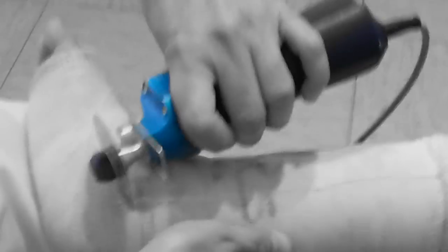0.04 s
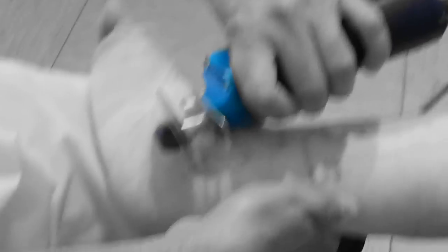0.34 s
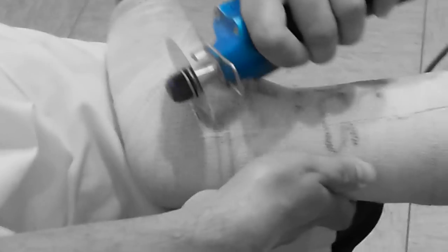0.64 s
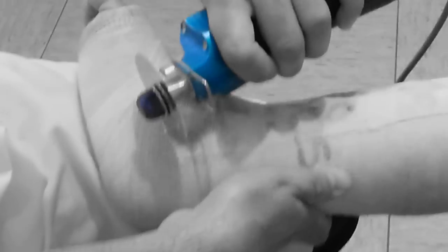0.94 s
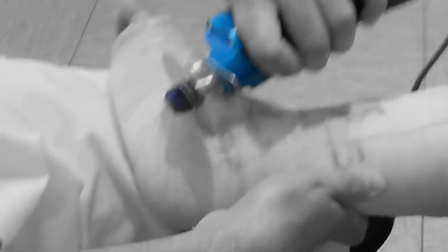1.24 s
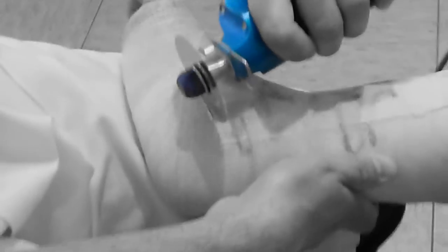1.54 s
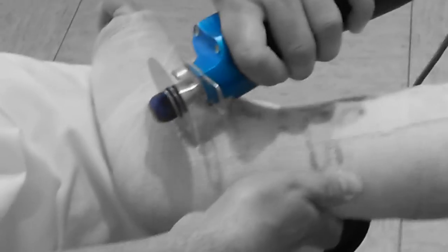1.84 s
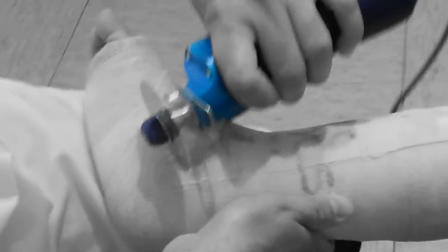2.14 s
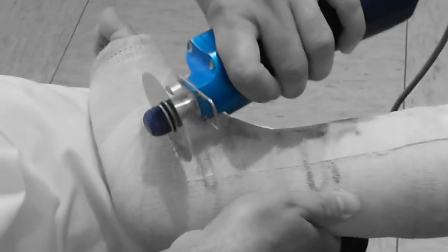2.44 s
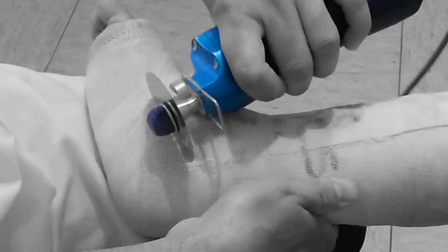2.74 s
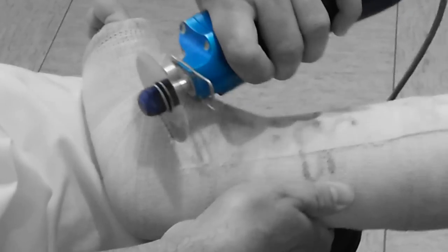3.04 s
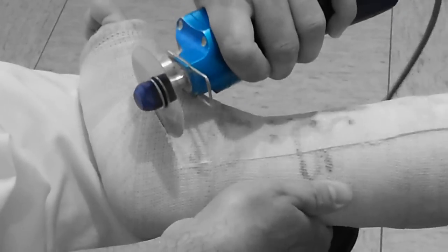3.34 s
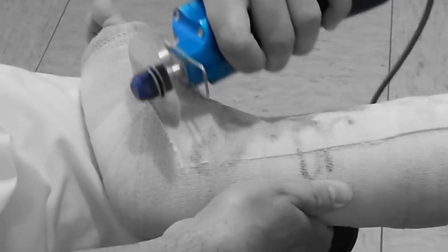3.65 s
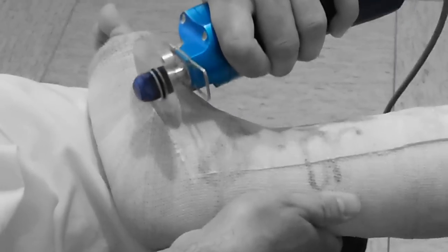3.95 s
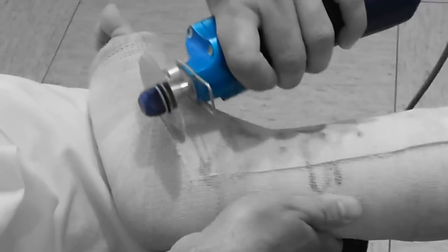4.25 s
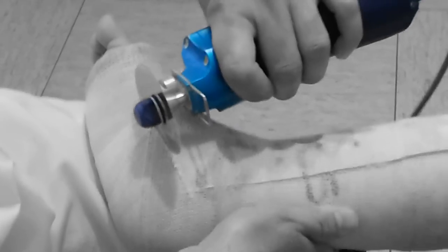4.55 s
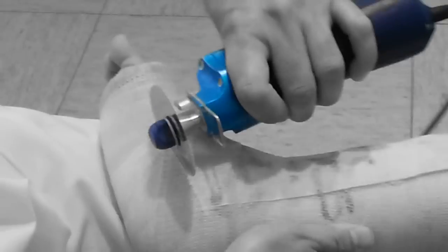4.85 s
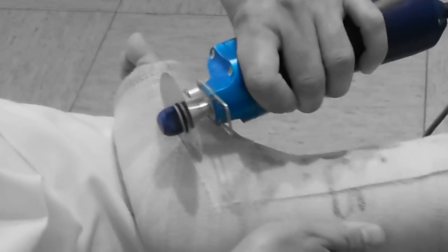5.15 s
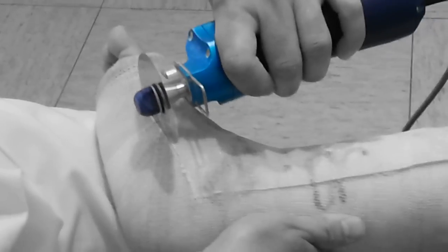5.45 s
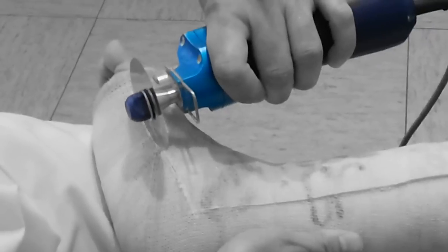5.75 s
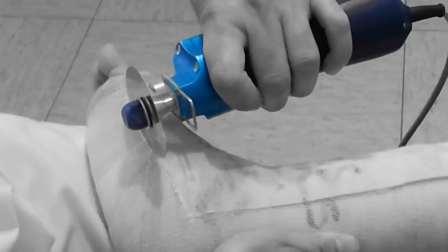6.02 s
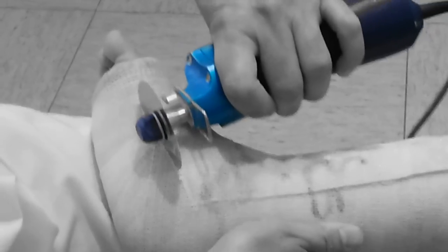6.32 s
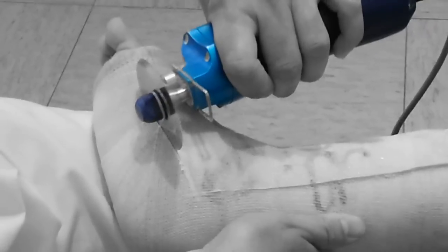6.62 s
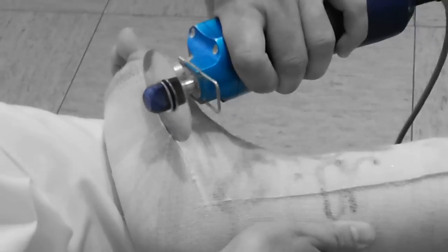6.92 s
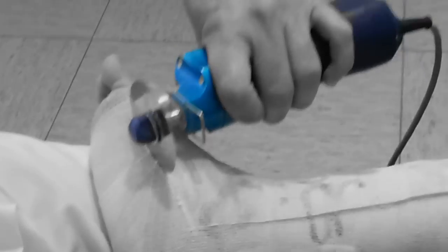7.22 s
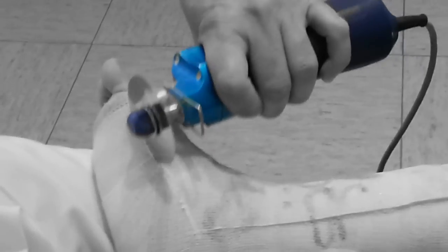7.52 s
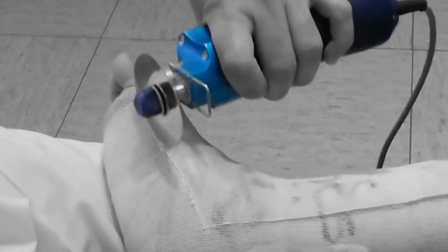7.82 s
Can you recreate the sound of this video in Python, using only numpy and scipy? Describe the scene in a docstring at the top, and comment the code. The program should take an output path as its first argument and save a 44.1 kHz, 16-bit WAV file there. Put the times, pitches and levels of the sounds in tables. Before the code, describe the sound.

Close to a stereo microphone in a small room, an oscillating saw buzzes through a plaster cast from start to finish. A bright ringing whine mixes with a gritty, hissing rasp and tiny snapping chips, above a lower motor hum and a faint rush. The pitch dips a little as the blade is pressed in. Thin squeals come and go, and short scraping crunches break in, with the cutting turning rougher near the end.

```python
"""The whine and rasp of an oscillating saw in a plaster cast, close to a camera's stereo mic in a small room.
Each swing knocks the hollow cast, which rings near 1.7 kHz; the teeth rasp through the plaster,
grinding grit and snapping off chips, and the pinched blade squeals. Underneath lies a steady rush,
and the motor hums at the stroke rate, sagging as the blade is pressed in.
Now and then the teeth catch with a short crunch."""
import sys
import numpy as np
from scipy import signal
from scipy.fft import rfft, irfft
from scipy.io import wavfile
from scipy.ndimage import uniform_filter1d, minimum_filter1d, map_coordinates

SR = 44100
rng = np.random.default_rng(int(sys.argv[2]) if len(sys.argv) > 2 else 0)


def output_pcm(signal):
    """Save a mono or channel-first signal as 16-bit PCM at the path in sys.argv[1].

    Samples are clipped to [-1, 1] before scaling.
    """
    pcm = np.clip(np.atleast_2d(signal).T, -1, 1) * 32767
    wavfile.write(sys.argv[1], SR, np.round(pcm).astype(np.int16))


N = 347508
TIME, BINS = np.arange(N) / SR, np.fft.rfftfreq(N, 1 / SR)
ORDERS, SHELL_ORDERS = np.arange(1, 73), np.arange(7, 12)  # multiples of the stroke rate

# the motor sags as the blade is pressed in and recovers as it is eased: time_s, stroke_hz
MOTOR_SPEED = [(0.0, 187), (0.2, 183.8), (0.64, 183), (0.92, 188.6), (1.1, 184.9), (2.18, 185.4),
               (2.42, 180.4), (2.56, 183.7), (2.76, 177.4), (2.9, 182.2), (3.18, 185), (3.56, 183.4),
               (3.66, 186.9), (3.96, 184.1), (4.08, 188.4), (4.26, 184.6), (4.48, 187), (4.62, 185.3),
               (5.32, 184.8), (5.48, 187.5), (5.68, 187), (6.04, 189.7), (6.34, 182.8), (6.66, 186.6),
               (6.86, 184.2), (7.18, 189.8), (7.36, 185.6), (7.87, 192.8)]
# how the blade sits in the slot: time_s, roughness (0-1)
BLADE_SEAT = [(0, 0.27), (.22, 0.12), (.62, 0.14), (.75, 0.32), (.95, 0.15), (1.85, 0.28), (2.02, 0.33),
              (2.2, 0.17), (2.85, 0.14), (3.45, 0.2), (3.62, 0.26), (3.8, 0.18), (4.9, 0.2), (5.6, 0.12),
              (5.87, 0.17), (6.2, 0.02), (6.33, 0.35), (6.45, 0.2), (7.1, 0.26), (7.45, 0.23), (7.66, 0.6),
              (7.88, 0.31)]
# three close modes of the hollow cast trade strength as the blade moves: time_s, low_db, mid_db, top_db
CAST_MODES = [(0, -36, -29, -19.5), (.24, -21.5, -20.5, -25.5), (.36, -23.5, -21.5, -30),
              (.55, -23, -19, -21.5), (.8, -30, -26, -19), (1.0, -47, -17.5, -17.5),
              (1.15, -35, -34, -17.5), (1.5, -26.5, -38, -16), (1.85, -26, -21, -17.5),
              (2.05, -51, -20.5, -26), (2.2, -70, -24, -17.5), (2.6, -50, -24.5, -19.5),
              (2.82, -54, -30, -20), (3.0, -43, -23, -29), (3.45, -43, -21, -30), (3.75, -20.5, -28, -19),
              (4.1, -35, -23, -21), (4.15, -24, -26, -16), (4.26, -22, -28, -23), (4.4, -30, -37, -20.5),
              (4.48, -25, -37, -19), (4.68, -28, -33, -21.5), (4.84, -28, -27, -22),
              (5.2, -28.5, -36, -24.5), (5.56, -27, -23, -22), (6.3, -31, -22, -30.5),
              (6.5, -31, -20, -27.5), (6.8, -29, -19.5, -29), (7.1, -38, -34, -24),
              (7.3, -25.5, -29, -17.5), (7.8, -27, -32, -56)]
# the blade slips off the shell for a moment: middle_s, half_length_s, ring_change_db, rasp_change_db
SKIPS = [(0.174, 0.042, -4.5, -2), (0.694, 0.057, -2, 1.5), (1.64, 0.045, -11, -2.5),
         (2.377, 0.069, -3, 0.5), (2.67, 0.033, -10, -1), (3.072, 0.013, -11, -4.5),
         (3.53, 0.028, -3, -1.5), (3.671, 0.016, -4, -5.5), (3.949, 0.036, -8, 1), (4.089, 0.023, -1.5, -1),
         (4.333, 0.027, -4, 0.5), (4.416, 0.028, -3.5, -3.5), (4.62, 0.034, -13, 1),
         (5.366, 0.019, -6, -1.5), (5.911, 0.13, -14, -0.5), (6.11, 0.022, 1, -2),
         (6.399, 0.0083, -4, -5.5), (6.679, 0.064, -8.5, 0.5), (6.94, 0.031, -30, -2.5),
         (7.163, 0.027, -23, -1.5), (7.515, 0.044, -14, -1.5), (7.613, 0.074, -18, -2)]
# colour of blade and plaster: frequency_hz, relative_db
BLADE_COLOUR = [(1290, 2), (2200, -3), (2390, -5.5), (2870, -2.5), (3170, -4.5), (3440, -2), (4390, -6.5),
                (4840, 0.5), (5410, 2.5), (6760, -7), (7900, -1.5), (9440, -11.5), (11000, -14.5),
                (11900, -24), (13000, -18)]
# the pinched blade sings in one of its modes: middle_s, length_s, pitch_hz, half_width_hz, strength_db
SQUEALS = [(0.35, 2.1, 7700, 260, 10.5), (0.11, 0.16, 3450, 263, 9.5), (0.476, 0.5, 2770, 80, 5.5),
           (0.56, 0.25, 3500, 260, 8), (0.943, 0.17, 3680, 150, 11), (1.105, 0.11, 5450, 330, 11),
           (1.366, 0.12, 5840, 150, 8), (1.342, 0.036, 3700, 400, -7), (1.51, 0.18, 3300, 130, 10),
           (1.496, 0.2, 5360, 260, 7), (1.75, 0.16, 5700, 150, 14), (1.91, 0.12, 3412, 170, 12),
           (2.387, 0.12, 3580, 260, 15.5), (2.7, 0.28, 3780, 258, 7), (2.4, 0.34, 5700, 170, 15),
           (2.87, 0.2, 5830, 170, 12), (2.94, 2.8, 10600, 259.7, 9), (3.348, 0.34, 3450, 200, -2),
           (3.7, 1.21, 5850, 263, 3), (4.696, 0.55, 3300, 110.2, 6), (5.0, 1.19, 5120, 90, 9),
           (5.16, 0.63, 4148, 110.1, 12), (5.6, 0.21, 3870, 110, 5), (5.931, 0.42, 3275, 170, 14.5),
           (5.93, 0.37, 4120, 110, 10), (5.9, 0.25, 5730, 550, 11), (6.65, 0.56, 3950, 240, 10),
           (7.1, 2.2, 7897, 259.8, 10.5)]
# colour of the grit, on top of the blade's: frequency_hz, relative_db
GRIT_COLOUR = [(2200, -17.5), (3500, -12), (5500, -9.5), (8000, -5.5), (10500, -4.5)]
# bite of the teeth, as rasp at 4.5-7 kHz and fizz above it: time_s, base_level_db, fizz_relative_db
TOOTH_BITE = [(0, -26, -1.5), (.1, -21, 0), (.6, -23.5, 2), (.95, -23, -3.5), (1.1, -22.5, -1),
              (3.3, -21.5, -1.5), (5.6, -22.5, -2.5), (5.92, -22, -2.5), (6.15, -23, -2), (6.7, -22, -0.1),
              (7.88, -22, -2.5)]
# motor and gear hum: order, base_level_db, db_per_hz_of_speed, waver_db
HUM_ORDERS = [(1, -43, -0.53, 1.2), (2, -38.5, 0.5, 2), (3, -37.5, 0, 0.7), (4, -40, 0, 2.5),
              (5, -40, 0, 2), (6, -37, -0.47, 0)]
# hum orders swell as the tool is moved and leaned on: time_s, second_db, third_db, fourth_db, fifth_db
HUM_SWELLS = [(0, 0, -5, -5, -5), (.2, -4, 0.5, 3.5, -9), (.68, -5, -4, -2, -9), (.86, -17, 4, -2, -1),
              (.96, -2.5, 0, -2.5, -4), (1.65, -7.5, 3.5, -4.5, -0.5), (2.1, -5, 2, -3, -1),
              (2.44, -5, -7, -7, -1), (2.65, 1, -3.5, -7, 1), (3.3, -4, 2, -9, 2), (3.52, -9, 4, -1, 8),
              (3.65, -3, 3.5, -4, 3), (3.95, -9, 2, -5, 6), (4.5, -8.5, 1.5, -4, -2),
              (5.3, -5, 5.5, -5, 1.5), (5.6, -6, -2, -20, -1), (5.92, 0.5, 6.5, 4, 6),
              (6.2, -1, -1.5, -5, -3), (6.4, -0.5, -6.5, 0, 3), (6.6, -5, -3.5, -6, -2),
              (7.1, -4.5, 1.5, -3, 1), (7.42, -2.5, -3, -2.5, -4), (7.65, -5, 7.5, -1, 2),
              (7.82, -5, -3, 5.5, 13)]
# steady rushing bed, strongest near 1.9 kHz: frequency_hz, relative_db
RUSH_COLOUR = [(25, -28), (90, -41), (150, -0.5), (215, 3.5), (270, -38), (450, -25), (850, -14),
               (1100, -22), (1400, -2), (1900, 12), (2400, -22), (6000, -18)]
# dull crunch of the cast giving way: frequency_hz, relative_db
CRUNCH_COLOUR = [(25, -19), (100, -7), (250, -2), (500, 7.5), (800, 8), (1300, 5), (1900, 2), (2600, -16),
                 (6000, -37)]
# moments when the coarse grit thins out: middle_s, half_length_s, change_db
GRIT_DIPS = [(0.42, 0.25, -8), (1.142, 0.057, -5), (1.54, 0.028, -2), (2.8, 0.11, -6), (3.371, 0.08, -2)]
# the teeth catch in the plaster: middle_s, half_length_s, crunch_db, scrape_db
CATCHES = [(0.75, 0.02, -48, -29), (0.82, .025, -57, -37), (1.638, 0.029, -48, -25.5),
           (2.01, 0.02, -49, -28), (2.064, 0.02, -48, -29), (2.165, 0.019, -60, -34),
           (2.446, 0.015, -57, -30), (2.636, 0.038, -50, -47), (3.125, 0.02, -51, -29),
           (3.5, 0.014, -52, -31), (3.595, 0.03, -52, -21.5), (3.746, 0.018, -56, -30),
           (3.983, 0.026, -66, -27), (4.12, 0.037, -66, -29), (4.355, .013, -55, -31),
           (4.672, 0.017, -51, -26), (4.839, 0.027, -54, -26), (5.939, 0.14, -54, -40),
           (6.292, 0.022, -43, -33), (7.071, 0.087, -62, -34), (7.694, 0.079, -50, -26)]
# scrape of the shell under a caught blade: frequency_hz, relative_db
SCRAPE_COLOUR = [(25, -64), (800, -11.5), (1150, -3.5), (1400, -4), (1800, 14), (2300, -20), (3600, -26),
                 (7000, -46)]
# balance at the microphone pair: frequency_hz, left_minus_right_db
MIC_BALANCE = [(185, 2), (550, 2), (740, 8.5), (1000, 0), (1300, -1.5), (1500, 12), (1850, 5), (2200, 1.5),
               (3500, 2.5), (5200, 11.5), (6500, 4), (8000, -13.5), (10000, -5.5), (12000, -1)]
# how alike the room sounds at the two microphones: frequency_hz, likeness (0-1)
MIC_LIKENESS = [(185, 1), (550, 0.15), (1100, 0.11), (1800, 0.34), (3000, 0.14), (6000, 0.45),
                (12000, 0.031)]
# phase across the microphone pair: frequency_hz, left_lead_rad
MIC_LEAD = [(185, 0.5), (550, 0.41), (800, -1), (1500, -1), (2100, -1.82), (3000, -3.5), (4000, -5.5),
            (5500, -5), (8000, -9), (12000, -14)]


def amp(db):
    """Decibels to gain."""
    return 10 ** (np.asarray(db) / 20)


def curve(rows, t):
    """Every column of a time table at the times t."""
    time_s, *columns = np.transpose(rows)
    return [np.interp(t, time_s, column) for column in columns]


def spectrum(points, hz):
    """A frequency table at hz, joined up on a log axis."""
    frequency_hz, value = np.transpose(points)
    return np.interp(np.log(hz + 1), np.log(frequency_hz + 1), value)


def unit_rms(x):
    """Scales a stereo pair so that its centre has rms 1."""
    return x / np.sqrt(np.mean(x.mean(0) ** 2) + 1e-20)


def chance(shape):
    """Complex normal numbers of power 1."""
    return (rng.standard_normal(shape) + 1j * rng.standard_normal(shape)) / np.sqrt(2)


def wander(shape, rate_hz, stroke_hz):
    """Complex random drift (.., strokes, orders) that changes at about rate_hz."""
    hz = np.fft.fftfreq(shape[-2], 1 / stroke_hz)[:, None]
    lowpass = 1 / (1 + (hz / rate_hz) ** 2)
    return np.fft.ifft(chance(shape) * lowpass / np.sqrt(np.mean(lowpass ** 2)), axis=-2, norm="ortho")


def jolts(samples):
    """Smooth random motion of rms 1 that changes over about this many samples."""
    x = uniform_filter1d(rng.standard_normal(N), samples, mode="wrap")
    x = uniform_filter1d(x, samples, mode="wrap")
    return x / x.std()


def mic_pair(z, hz):
    """Gives two spectra the balance and phase of the left and right microphones."""
    half = amp(spectrum(MIC_BALANCE, hz) / 2) * np.exp(.5j * spectrum(MIC_LEAD, hz))
    return np.array([z[0] * half, z[1] / half]) / np.sqrt((abs(half) ** 2 + abs(half) ** -2) / 2)


def room_blend(z, hz):
    """Makes two unrelated draws partly alike, as direct and reflected sound are."""
    alike = np.clip(spectrum(MIC_LIKENESS, hz), 0, 1)
    return np.array([z[0], alike * z[0] + np.sqrt(1 - alike ** 2) * z[1]])


def room_noise(colour_db):
    """Coloured noise of rms 1 as the microphone pair hears it."""
    white = room_blend(chance((2, len(BINS))), BINS)
    return unit_rms(irfft(mic_pair(white, BINS) * amp(colour_db), N))


def play_strokes(orders, turns, stroke_hz, size=1024):
    """Turns the orders of each stroke into its wave and runs through the strokes at motor speed."""
    waves = irfft(np.pad(mic_pair(orders, ORDERS * stroke_hz), ((0, 0), (0, 0), (1, 0))), size)
    waves = np.concatenate([waves, waves[..., :1]], -1) * size / np.sqrt(2)
    return np.array([map_coordinates(w, [turns, turns % 1 * size], order=1, mode="nearest") for w in waves])


def catch_swells(t):
    """One swell from 0 to 1 and back for each catch of the blade."""
    middle_s, half_s, _, _ = np.transpose(CATCHES)
    return np.exp(-np.minimum(((t[:, None] - middle_s) / half_s) ** 2, 20))


def roughness(t, per_catch=0.11):
    """How unevenly the blade runs: its seat in the slot, and a jump at each catch."""
    return curve(BLADE_SEAT, t)[0] + per_catch * catch_swells(t).sum(1)


def skip_db(t):
    """Brief change of the ring and of the rasp each time the blade slips off the shell."""
    middle_s, half_s, ring_db, rasp_db = np.transpose(SKIPS)
    slips = np.exp(-((t[:, None] - middle_s) / half_s) ** 2)
    return slips @ ring_db, slips @ rasp_db


def whole_ring_db(t):
    """Level of the cast's three modes together, skips included."""
    return 10 * np.log10((amp(curve(CAST_MODES, t)) ** 2).sum(0)) + skip_db(t)[0]


def cast_ring(t, stroke_hz, swap_db=1.5, flutter=0.41, scatter=0.84, mic_drift=0.4, slip_rad=0.92):
    """Each swing knocks the hollow cast a little early or late; its modes answer one after another."""
    rough, order = roughness(t)[:, None], SHELL_ORDERS
    hz, shape = order * stroke_hz, (2, len(t), len(order))
    modes_db, whole_db = np.array(curve(CAST_MODES, t)) + skip_db(t)[0], whole_ring_db(t)
    level = amp(np.vstack([whole_db - 23, modes_db, whole_db - 12])).T  # a weaker order on either side
    lag_rad = 0.78 * order + 0.33 * (order - order.mean()) ** 2
    lag_rad = lag_rad + slip_rad * rough * rng.standard_normal((len(t), 1))
    swap = amp(swap_db * np.sqrt(2) * wander(shape[1:], 5.6, stroke_hz).real)
    unrest = mic_drift * wander(shape, 12.3, stroke_hz)
    unrest += rough * (flutter * wander(shape, 31, stroke_hz) + scatter * chance(shape))
    partials = level * swap * np.exp(-1j * lag_rad) * (1 + room_blend(unrest, hz))
    power = uniform_filter1d((abs(mic_pair(partials, hz)) ** 2).mean(0).sum(1), size=9)
    steady = np.sqrt((level ** 2).sum(1) / power)[:, None]  # the modes trade energy, the total stays
    force = 1 + 0.25 * wander((len(t), 1), 23, stroke_hz).real
    return (partials * steady * force) @ (order[:, None] == ORDERS)


def tooth_rasp(t, stroke_hz, drift_hz=2.9, flutter=3.4, flutter_hz=26, patchy_db=2.0, evenness=0.73):
    """The teeth scrape nearly the same track on each stroke; slips blur the high orders most."""
    shape = (2, len(t), len(ORDERS))
    blur = flutter * roughness(t)[:, None] * np.minimum(ORDERS / 26, 1.2)
    groove = wander(shape, drift_hz, stroke_hz)
    slips = blur * wander(shape, flutter_hz, stroke_hz)
    track = (groove / abs(groove) ** evenness + slips) / np.sqrt(1 + blur ** 2)
    patches = uniform_filter1d(wander(shape[1:], 51, stroke_hz).real, size=3, axis=1)
    return room_blend(track, ORDERS * stroke_hz) * amp(patchy_db * patches / patches.std())


def blade_squeals(t, stroke_hz, unsteady=0.55, gain=0.57):
    """The pinched blade sings: orders near one of its modes swell and fade."""
    rattle = unsteady * wander((2, len(t), len(ORDERS)), 9.4, stroke_hz)
    squeals = np.zeros_like(rattle)
    for middle_s, length_s, pitch_hz, half_width_hz, strength_db in SQUEALS:
        swell = np.exp(-(2 * (t[:, None] - middle_s) / length_s) ** 2)
        mode = 1 / (1 + ((ORDERS * stroke_hz - pitch_hz) / half_width_hz) ** 4)
        tone = np.exp(2j * np.pi * rng.random((2, 1, len(ORDERS))))
        squeals += amp(strength_db) * swell * mode * (tone + rattle)
    return gain * squeals


def plaster_grit(turns, gain_db=-2, surge=0.3, chips_per_s=160, chips_db=-16, spread_db=5.0):
    """Plaster is ground in a surge on each swing, out and back, and small chips snap off."""
    colour_db = spectrum(BLADE_COLOUR, BINS) + spectrum(GRIT_COLOUR, BINS)
    dust = room_noise(colour_db) * (1 + surge * np.cos(4 * np.pi * turns))
    snaps = (rng.random(N) < chips_per_s / SR) * amp(spread_db * np.minimum(rng.exponential(1, N), 5))
    burst = rng.standard_normal((2, 200)) * np.exp(-TIME[:200] / .0005)
    chips = unit_rms(irfft(mic_pair(rfft(snaps) * rfft(burst, N), BINS) * amp(colour_db), N))
    return amp(gain_db) * (dust + amp(chips_db) * chips)


def hold_level(x, db, samples=3500):
    """Gives a stereo layer the level curve db, leaving its quick flutter."""
    power = uniform_filter1d(uniform_filter1d(x.mean(0) ** 2, samples), samples)
    return x * amp(db) / np.sqrt(abs(power) + 1e-12)


def tooth_bite(x, lowest_hz=1330, trade=0.056, low_trade=0.013, restless_db=0.75):
    """Pressure sets level and brightness of the cutting noise; it grows where the cast rings less."""
    (base_db, fizz_db), ring_db = curve(TOOTH_BITE, TIME), whole_ring_db(TIME)
    damped_db = ring_db.mean() - ring_db
    level_db = base_db + trade * damped_db
    low = 1 / (1 + (BINS / 4500) ** 16)
    high = 1 - 1 / (1 + (BINS / 7000) ** 20)
    bands = [(low, low_trade * damped_db), (1 - low - high, 0), (high, fizz_db)]
    radiated = rfft(x) * (1 - 1 / (1 + (BINS / lowest_hz) ** 10))  # the thin blade radiates no bass
    return sum(hold_level(irfft(radiated * band, N), level_db + db + restless_db * jolts(samples=2500))
               for band, db in bands)


def motor_hum(t, stroke_hz, drift=0.43, flutter=0.49, wobble=0.1, waver_hz=4):
    """Clean low orders swell and sink as the hand moves the tool; the higher ones tremble more."""
    speed_hz, = curve(MOTOR_SPEED, t[:, None])
    order, base_db, db_per_hz, waver_db = np.transpose(HUM_ORDERS)
    swell_db = np.pad(np.transpose(curve(HUM_SWELLS, t)), ((0, 0), (1, 1)))
    shape, looseness = (2, len(t), len(order)), np.minimum(order / 3, 1)
    sway = drift * room_blend(wander(shape, 2.7, stroke_hz), order * stroke_hz)
    tremble = flutter * room_blend(wander(shape, 21, stroke_hz), order * stroke_hz)
    hand = 1 + wobble * wander((len(t), 1), 14, stroke_hz).real
    waver = waver_db * np.sqrt(2) * wander(shape[1:], waver_hz, stroke_hz).real
    level = hand * amp(base_db + db_per_hz * (speed_hz - stroke_hz) + swell_db + waver)
    partials = level * (1 + looseness * (sway + tremble)) * np.exp(2j * np.pi * rng.random(len(order)))
    return partials @ (order[:, None] == ORDERS)


def steady_rush(level_db=-46):
    """A steady bed of rushing noise, strongest near 1.9 kHz where the cast rings."""
    return amp(level_db) * room_noise(spectrum(RUSH_COLOUR, BINS))


def crumbling(speed_hz, rough, base_db=-56, sag_db_per_hz=1.2, stumble_db=5):
    """The cast crumbles quietly all along, more when the blade is pressed until it slows, or stumbles."""
    lumps_db = 6 * np.tanh(jolts(samples=1500))
    strain_db = sag_db_per_hz * (speed_hz.mean() - speed_hz) + stumble_db * (rough - rough.mean())
    return room_noise(spectrum(CRUNCH_COLOUR, BINS)) * amp(base_db + strain_db + lumps_db)


def thin_grit(grit, coarse_hz=3200):
    """The coarse grit, below about 3 kHz, thins out for moments."""
    middle_s, half_s, change_db = np.transpose(GRIT_DIPS)
    drop_db = np.exp(-np.minimum(((TIME[:, None] - middle_s) / half_s) ** 2, 5) ** 2) @ change_db
    coarse = irfft(rfft(grit) / (1 + (BINS / coarse_hz) ** 10), N)
    return grit + coarse * (amp(drop_db) - 1)


def blade_catches(turns, uneven_db=2.0, decay_strokes=0.71):
    """A caught blade tears at the plaster with uneven blows: a dull crunch and a scrape of the shell."""
    stroke = turns.astype(int)
    force = amp(-uneven_db * np.clip(rng.standard_normal(stroke[-1] + 1), -1.5, 1.5))
    blows = uniform_filter1d(force[stroke] * np.exp(-(turns % 1) / decay_strokes), size=60)
    _, _, crunch_db, scrape_db = np.transpose(CATCHES)
    swells, tearing = catch_swells(TIME), np.zeros((2, N))
    for colour, level_db in (CRUNCH_COLOUR, crunch_db), (SCRAPE_COLOUR, scrape_db):
        tear = irfft(rfft(room_noise(0) * blows) * amp(spectrum(colour, BINS)), N)
        tearing += unit_rms(tear) * (swells @ amp(level_db))
    return tearing


def scene(ring_db=-0.23, hum_db=-0.16, hunting=0.001497, judder_db=0.76, rough_grit=2.52):
    """The saw from close by: one shaft drives knocks, rasp, grit and hum."""
    (speed_hz,), rough = curve(MOTOR_SPEED, TIME), roughness(TIME)
    turns = np.cumsum(speed_hz * (1 + hunting * jolts(samples=900))) / SR
    t, stroke_hz = np.interp(np.arange(1500), turns, TIME), speed_hz.mean()  # t: start of each stroke
    ring = amp(ring_db) * cast_ring(t, stroke_hz)
    hum = amp(hum_db) * motor_hum(t, stroke_hz)
    whine = play_strokes(ring + hum, turns, stroke_hz)
    blade = tooth_rasp(t, stroke_hz) + blade_squeals(t, stroke_hz)
    blade *= amp(spectrum(BLADE_COLOUR, ORDERS * stroke_hz))
    rasp = unit_rms(play_strokes(blade, turns, stroke_hz))
    dusty = rough_grit * (rough + 1 / 6)  # a stumbling blade grinds more grit
    cutting = tooth_bite(rasp + dusty * thin_grit(plaster_grit(turns)))
    cutting *= amp(skip_db(TIME)[1] + judder_db * jolts(samples=1000))  # the blade feeds in unevenly
    return whine + cutting + blade_catches(turns) + crumbling(speed_hz, rough) + steady_rush()


def record(dry):
    """The camera's limiter eases the gain down around the highest peaks; its treble ends at 12.5 kHz."""
    safe_gain = np.minimum(.96 / (abs(dry).max(0) + 1e-9), 1)
    gain = uniform_filter1d(minimum_filter1d(safe_gain, size=500), size=500)
    lowpass = signal.firwin(201, 12500, window=("kaiser", 9), fs=SR)
    return signal.oaconvolve(dry * gain, lowpass[None], "same")


dry = scene()
out = record(dry)
output_pcm(out)
```